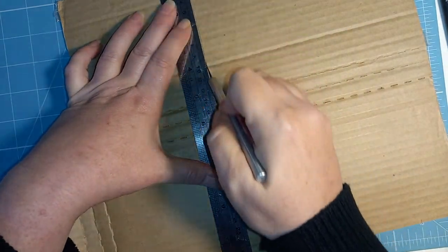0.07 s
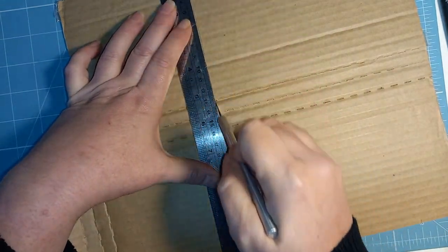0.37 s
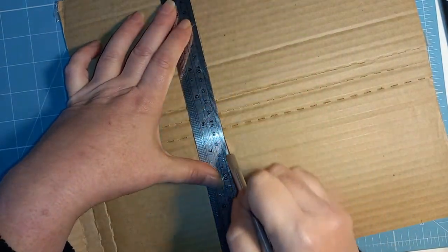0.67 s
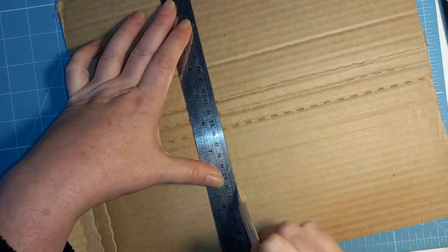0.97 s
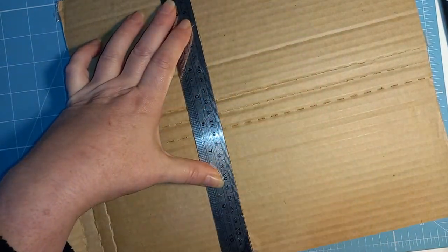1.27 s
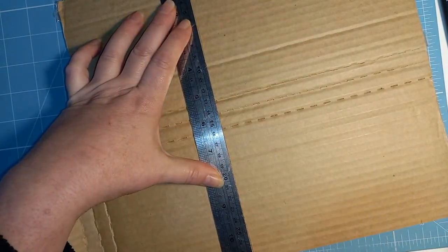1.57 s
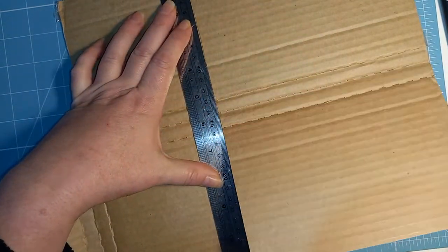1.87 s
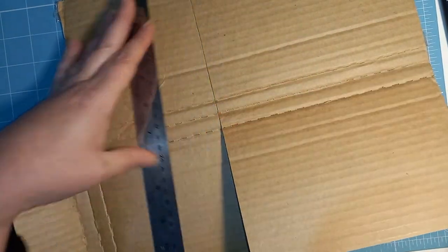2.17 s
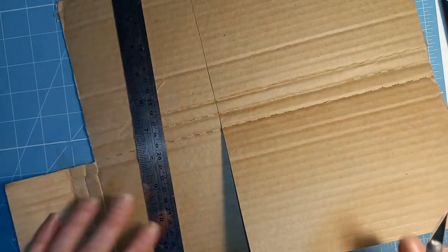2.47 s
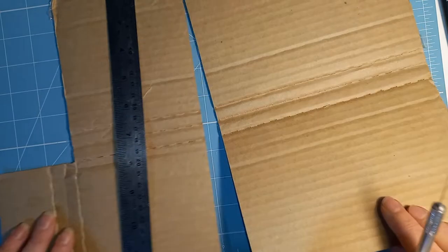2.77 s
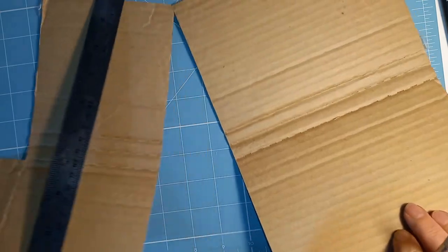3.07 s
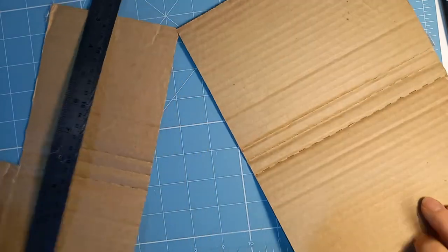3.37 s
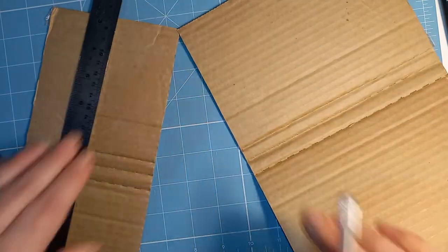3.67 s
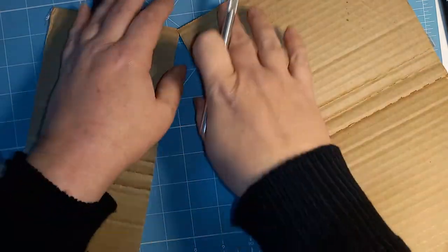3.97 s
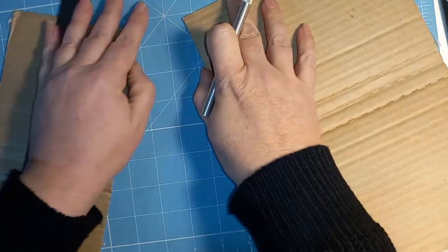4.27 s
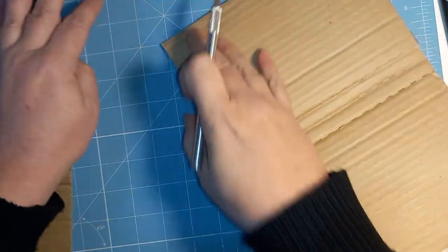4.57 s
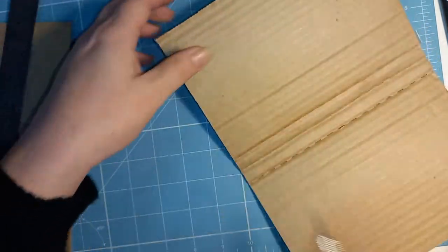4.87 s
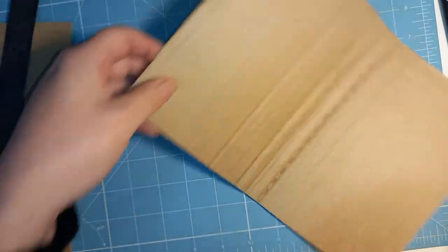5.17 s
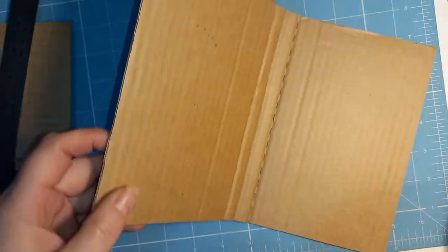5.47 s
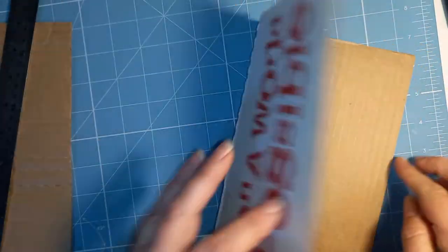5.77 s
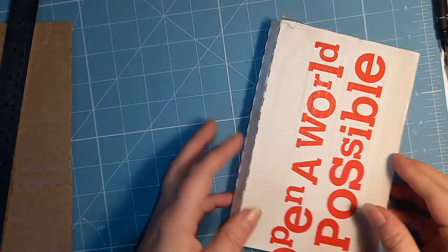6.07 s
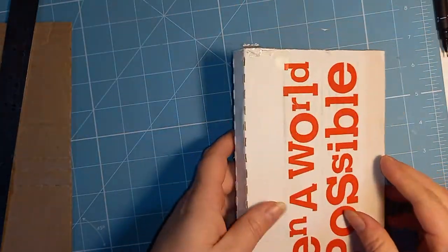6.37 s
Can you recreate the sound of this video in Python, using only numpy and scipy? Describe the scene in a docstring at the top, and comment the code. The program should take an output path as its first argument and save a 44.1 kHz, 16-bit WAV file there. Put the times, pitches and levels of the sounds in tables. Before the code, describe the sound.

A knife rasps through corrugated cardboard, then the card slides over a mat and folds shut with creaks and hollow claps.

```python
"""A craft knife rasps along a steel ruler through corrugated cardboard, tearing flute after flute.
The last fibres snap, the offcut hisses over the mat in three pulls, and the ruler drops with a clink.
Hands sweep the card across the mat and brush its liner. The flaps creak and fold shut with hollow
claps, then the fingers rub the piece again. Friction and blows ring the modes of the sheet;
all is heard close up, on a table in a small room."""
import sys
import numpy as np
from scipy import signal
from scipy.fft import rfft, irfft
from scipy.io import wavfile

SR = 44100
rng = np.random.default_rng(int(sys.argv[2]) if len(sys.argv) > 2 else 0)


def wav_out(sig):
    """Save sig, one row per channel (or a flat mono array), as 16-bit PCM at SR to the path in sys.argv[1]."""
    wavfile.write(sys.argv[1], SR, np.round(np.clip(np.atleast_2d(sig).T, -1, 1) * 32767).astype(np.int16))


N = 286694
TIME = np.arange(N) / SR
APART_HZ = 458   # left and right differ mainly above this

# force spectrum of a dull thud: freq_hz, level_db
THUD_DRIVE = [(30, -10), (70, -16), (130, -8.5), (280, 2), (420, -20), (800, -37.5), (2500, -78)]
# force spectrum of a hollow clap: freq_hz, level_db
CLAP_DRIVE = [(120, -34.5), (300, 2.5), (480, 16.5), (1200, 8.5), (2500, 3), (4000, -19), (9000, -30.5)]


def knife(give_s=.012, echo_s=.00088, echo_drift_s_per_s=.000421):
    """The blade scratches along and tears through each flute wall, jolting the sheet as it gives."""
    # force of the stroke: time_s, tear_db, rasp_db, shudder_db
    stroke = [(0.0, -42, -47.5, -42), (0.262, -43.5, -48.5, -50.5), (0.484, -36.5, -48, -41),
              (0.51, -47.5, -53, -49), (0.55, -36, -45, -45), (0.58, -40.5, -53, -42.5),
              (0.606, -38, -52, -45), (0.892, -40, -46, -38.5), (1.132, -41, -54.5, -45.5),
              (1.32, -37.5, -61, -39), (1.5, -42.5, -57, -46.5), (1.57, -86, -94, -67)]
    # blade travel: time_s, walls_passed
    travel = [(0, 0.1), (.042, 1), (.33, 6), (.478, 9), (.627, 11), (.778, 14), (.903, 17), (1.425, 28),
              (1.487, 29), (1.56, 29.6)]
    # short pushes through what still holds: peak_s, half_length_s, tear_db, rasp_db, shudder_db
    nicks = [(1.667, 0.0081, -41, -72, -40.5), (1.68, 0.058, -58, -72, -59),
             (1.813, 0.034, -50.5, -50, -52.5), (1.893, 0.011, -62, -60, -46)]
    # spectrum of a tearing wall: freq_hz, density_db
    tear_spectrum = [(600, -4.5), (1500, -6), (2300, -11.5), (3400, -6.5), (4700, -3), (6000, -7.5),
                     (8000, -2), (10000, -2), (12800, 8.5), (15500, -0.5)]
    # spectrum of the scratch between flutes: freq_hz, density_db
    scratch_spectrum = [(600, -21.5), (1500, -7.5), (2300, -7.5), (3200, -5), (4700, -4), (6000, -9),
                        (8000, -3.5), (10000, -0.5), (12800, 3), (15500, -3)]
    # force spectrum of the blade: freq_hz, level_db
    blade_drive = [(120, -21.5), (240, 10), (420, -2.5), (650, 2.5), (950, -10), (1500, 2.5), (2500, -0.5),
                   (5000, -56.5)]
    # force spectrum of the jolts: freq_hz, level_db
    shudder_drive = [(30, 6), (70, 3.5), (125, -4.5), (240, -13), (450, -39), (1500, -28.5)]
    bite_flutes, tear_flutes, lead_flutes = .2, .57, .33
    gate, tear_db, rasp_db, shudder_db = curves(stroke)
    _, passed = curves(travel)
    flute, depth = np.divmod(passed + lead_flutes, 1)
    toughness = from_db(rng.standard_normal(int(flute[-1]) + 1))[flute.astype(int)]
    bite = 1 - np.exp(-(depth / bite_flutes) ** 2)
    walls = toughness * bite * np.exp(-(depth / tear_flutes) ** 2)
    jolts = np.diff(np.floor(np.interp(TIME - give_s, TIME, passed)), prepend=0)
    tear_gain = gate * from_db(tear_db + 3) * walls
    scratch_gain = gate * from_db(tear_db - 6 - 3 * TIME)
    rasp_gain = gate * from_db(rasp_db - .5) * (walls + .5)
    shudder_gain = gate * from_db(shudder_db - 1)
    for peak_s, half_s, tear_db, rasp_db, shudder_db in nicks:
        tear_gain += from_db(tear_db) * swell(peak_s, half_s, half_s)
        rasp_gain += from_db(rasp_db) * swell(peak_s, half_s, half_s)
        shudder_gain += from_db(shudder_db) * swell(peak_s + give_s, half_s, half_s)
    grit = fibres(rate_per_s=3500, spread_db=3.5, grain_s=.0004)
    hiss = tear_gain * stereo(colour(grit, tear_spectrum), pan_db=-1)
    hiss += scratch_gain * stereo(colour(grit, scratch_spectrum))
    # the reflection off the ruler lags more as the blade travels
    delayed_s = TIME - echo_s - echo_drift_s_per_s * TIME
    hiss += from_db(-9) * np.array([np.interp(delayed_s, TIME, side) for side in hiss])
    rasp = stereo(board(grit, blade_drive))
    chatter = rng.standard_normal((2, N))
    shudder = stereo(board(.5 * rms_one(jolts) + chatter, shudder_drive))
    shudder /= np.sqrt(np.average(shudder[0] ** 2, weights=gate))
    return hiss + rasp_gain * rasp + shudder_gain * shudder


def sheet_hum():
    """The sheet hums under the blade, lower as the cut grows."""
    # sheet resonance: time_s, level_db, pitch_hz
    hum = [(0.0, -57.5, 900), (0.3, -53.5, 960), (0.6, -51.5, 950), (0.9, -51, 920), (1.1, -61.5, 740),
           (1.4, -57.5, 690), (1.53, -78, 680)]
    gate, level_db, pitch_hz = curves(hum)
    return gate * from_db(level_db - 2) * stick_slip(pitch_hz, width_hz=200, overtone_db=-20)


def knocks(hard_db=-18):
    """Each blow on the sheet gives a thud, a hollow clap, a slap of trapped air and a dry crack."""
    # spectrum of air squeezed from between the faces: freq_hz, density_db
    slap_spectrum = [(200, -18.5), (500, -7.5), (900, -3.5), (1500, -15.5), (2500, -20.5), (5000, -52.5)]
    # spectrum of crushed fibres: freq_hz, density_db
    crack_spectrum = [(1200, -6.5), (2400, 4.5), (3200, 2), (4600, -3), (6000, -10), (10000, -8.5),
                      (15500, -21)]
    out = np.zeros((2, N))
    for start_s, thud_db, clap_db, crack_db, pan_db in blows():
        impulse = 14 * min(from_db(clap_db - hard_db), 1)   # light touches land softly
        force = burst(t60_s=.012, tail_db=-18, tail_t60_s=.12)
        force[0, 0] += impulse
        puff = burst(t60_s=.005, tail_db=-30, tail_t60_s=.04)
        puff[0, 0] += impulse
        crush = burst(t60_s=.011, tail_db=-17, tail_t60_s=.1)
        sound = from_db(thud_db - 11) * stereo(board(force, THUD_DRIVE))
        sound += from_db(clap_db - 16) * stereo(board(force, CLAP_DRIVE), pan_db)
        sound += from_db(clap_db - 18) * stereo(colour(puff, slap_spectrum), pan_db)
        sound += from_db(crack_db - 16) * stereo(colour(crush, crack_spectrum), pan_db / 2)
        add(out, start_s, sound)
    return out


def blows(rebound_s=.012, rebound_loss_db=5):
    """Yield each blow and its ever weaker rebounds."""
    # blows on the sheet: start_s, thud_db, clap_db, crack_db, pan_db, rebounds (rounded; -1 mutes)
    hits = [(3.438, -35.5, -40, -27.5, 4, 0.5), (3.473, -42, -40.5, -32.5, 4, 1),
            (5.555, -61, -23, -39.5, -5.5, -0.5), (5.581, -26, -17, -32.5, -8, 0),
            (5.592, -54, -21.5, -28, -1, 0), (5.644, -34.5, -34.5, -36, 0, 0.5),
            (5.708, -20.5, -24.5, -34, -3, 3), (5.754, -18, -18.5, -32, 4, -0.5),
            (5.762, -23.5, -25, -27, 5, 0), (5.792, -25.5, -33, -28.5, 1, 0),
            (5.802, -29, -21, -31.5, -14, 0), (5.811, -27, -14.5, -26, 1.5, 0),
            (5.846, -26.5, -22, -34, -1.5, 1.5), (5.909, -36.5, -27.5, -40, -2, 1),
            (6.024, -55, -36, -60, -5, 0), (6.048, -44, -38, -48, 4, -1), (6.09, -62, -46, -54, -6, 0),
            (6.325, -35.5, -27, -43.5, -3.5, 4.5)]
    for start_s, thud_db, clap_db, crack_db, pan_db, rebounds in hits:
        for k in range(round(rebounds) + 1):
            loss_db = k * rebound_loss_db
            yield start_s, thud_db - loss_db, clap_db - loss_db, crack_db - loss_db, pan_db
            start_s += rebound_s * rng.uniform(.8, 1.2)


def folding(hollow_hz=666):
    """Uneven slips of the flaps sound the hollow between them."""
    # creaks around the fold: start_s, length_s, level_db
    creaks = [(5.21, 0.14, -53), (5.578, 0.071, -30), (5.714, 0.085, -26.5), (5.848, 0.2, -37.5),
              (6.151, 0.25, -49), (6.38, 0.056, -56.5)]
    # force spectrum of the slips: freq_hz, level_db
    fold_drive = [(60, -32.5), (250, 5), (420, -6), (640, 3.5), (900, -7), (2500, -7), (5000, -16.5),
                  (12000, 5)]
    grit = fibres(rate_per_s=640, spread_db=6, grain_s=.0012) * grip(rate_hz=22, depth_db=1.5)
    slips = board(grit, fold_drive)
    creak = stereo(slips + from_db(-5) * resonate(slips, hollow_hz, width_hz=64), pan_db=-3)
    return creak * sum(from_db(db + 1) * hand_push(start_s, length_s) for start_s, length_s, db in creaks)


def sliding():
    """Card dragged on the mat: catching fibres hiss and drive the sheet, and the edge sings."""
    # three pulls on the offcut, each a list of: time_s, hiss_db, rasp_db
    pulls = [
        [(1.95, -74, -75), (2.008, -36, -48), (2.068, -45.5, -55.5), (2.118, -38, -47), (2.178, -43, -55),
         (2.208, -43.5, -52), (2.244, -50, -55.5), (2.28, -73, -78)],
        [(2.44, -97, -72), (2.452, -72, -90), (2.494, -63, -77), (2.56, -62.5, -66), (2.614, -55.5, -76),
         (2.684, -49, -60.5), (2.744, -47, -59), (2.82, -63, -73)],
        [(2.82, -60.5, -70.5), (2.944, -51.5, -64.5), (3.1, -50, -61.5), (3.142, -52, -59), (3.154, -51, -54.5),
         (3.312, -66, -67.5), (3.384, -50.5, -64), (3.425, -50, -50)],
    ]
    # a hand sweeps the card along: start_s, length_s, hiss_db, rasp_db, rumble_db
    sweeps = [(3.982, 0.059, -59, -50, -45.5), (4.123, 0.092, -38, -45.5, -44.5),
              (4.32, 0.067, -43.5, -51, -76), (4.386, .1, -48, -52, -79), (4.485, 0.066, -45, -47.5, -65)]
    # resonance of the turning edge: time_s, level_db, pitch_hz
    edge = [(2.28, -70, 1750), (2.58, -68.5, 1795), (2.72, -52, 1916), (2.82, -62.5, 1796),
            (3.16, -59.5, 1326), (3.36, -64.5, 1305)]
    # spectrum of card on the mat: freq_hz, density_db
    hiss_spectrum = [(700, -23), (1800, -16.5), (3200, 8.5), (4600, 0), (6000, 2), (9000, 5.5), (12800, 7),
                     (15500, 2)]
    # force spectrum of the rasp: freq_hz, level_db
    rasp_drive = [(100, -13.5), (250, -0.5), (450, -5.5), (700, -4.5), (1200, 3.5), (1800, 7), (3000, 2.5),
                  (6000, 4)]
    # force spectrum of the rumble: freq_hz, level_db
    rumble_drive = [(30, 18.5), (70, -7), (130, -6), (220, 0.5), (400, -6.5), (1000, -48.5)]
    grit = fibres(rate_per_s=3000, spread_db=3.5, grain_s=.0014) * grip(rate_hz=29, depth_db=1.26)
    hiss = stereo(colour(grit, hiss_spectrum), pan_db=1.5)
    rasp = stereo(board(grit, rasp_drive), pan_db=1.5)
    rumble = stereo(board(grit, rumble_drive))
    gate, edge_db, pitch_hz = curves(edge)
    out = gate * from_db(edge_db - 4) * stick_slip(pitch_hz, width_hz=520, overtone_db=-13)
    body = from_db(.5) * rasp + from_db(-4) * rumble
    for pull in pulls:
        gate, hiss_db, rasp_db = curves(pull)
        out += gate * (from_db(hiss_db - 1) * hiss + from_db(rasp_db) * body)
    for start_s, length_s, hiss_db, rasp_db, rumble_db in sweeps:
        sweep = from_db(hiss_db) * hiss + from_db(rasp_db) * rasp + from_db(rumble_db) * rumble
        out += from_db(-1.5) * hand_push(start_s, length_s) * sweep
    return out


def ruler():
    """The steel strip lands and rings briefly, damped by the card under it."""
    # landings: start_s, level_db
    hits = [(3.441, -40.5), (3.473, -34)]
    # modes, from slow flexing to clink: freq_hz, level_db, t60_s
    modes = [(62.5, 2, 0.13), (98, 6, 0.048), (2300, -2, 0.15), (4160, -14.5, 0.071), (4520, -11, 0.15),
             (5200, -7.5, 0.08), (8430, -9.5, 0.065), (9560, -5.5, 0.045)]
    out, t = np.zeros((2, N)), TIME[:SR // 2]
    for start_s, hit_db in hits:
        for hz, mode_db, t60_s in modes:
            cycles = hz * t + rng.random((2, 1)) * min(hz / APART_HZ, 1)
            add(out, start_s, from_db(hit_db + mode_db - 60 * t / t60_s) * np.sin(2 * np.pi * cycles))
    return out


def snaps():
    """Snapping fibres and small dry contacts tick, too light to move the whole sheet."""
    # ticks: start_s, level_db
    ticks = [(0.417, -16), (1.617, -43), (1.731, -37), (1.7643, -25), (1.795, -19.5), (1.8203, -20),
             (1.832, -19), (1.8854, -24.5), (1.8895, -22), (2.1143, -22), (4.0585, -17.5), (4.8261, -44.5),
             (5.062, -42), (5.28, -31.5), (5.389, -44), (5.4739, -28.5), (5.5917, -8.5), (5.689, -27),
             (5.968, -30), (6.289, -32.5)]
    # spectrum of a tick: freq_hz, density_db
    tick_spectrum = [(300, -18.5), (700, -1), (2000, -3.5), (4500, -3.5), (9000, 0.5), (15500, -0.5)]
    out = np.zeros((2, N))
    for start_s, level_db in ticks:
        tick = colour(burst(t60_s=.015, tail_db=-29.5, tail_t60_s=.45), tick_spectrum)
        add(out, start_s, from_db(level_db - 31) * stereo(tick))
    return out


def crease(start_s=5.5925):
    """The stiff liner buckles once, with a short bright ring."""
    out = np.zeros((2, N))
    ring = resonate(burst(t60_s=.0057, tail_db=-31, tail_t60_s=.08), hz=4620, width_hz=500)
    add(out, start_s, from_db(-44.5) * stereo(ring, pan_db=-6))
    return out


def fingers(let_go_s=.011, sag_hz_per_s=900):
    """Skin hisses on the liner, and sticks and slips in a narrow band that sinks as it slows."""
    # brushes that gather speed until they let go: peak_s, rise_s, level_db
    brushes = [(5.064, .04, -56), (5.238, 0.098, -47), (5.3, 0.1, -57), (5.452, 0.24, -65.5),
               (6.27, 0.059, -59.5), (6.461, 0.025, -57.5)]
    # dull fingertip squeaks: peak_s, half_length_s, level_db, pitch_hz
    rubs = [(2.215, 0.02, -43, 1285), (5.058, 0.039, -52.5, 1328), (5.2, 0.083, -64, 1296),
            (6.115, 0.017, -43, 1257), (6.23, .025, -42, 1312)]
    # spectrum of skin on the liner: freq_hz, density_db
    skin_spectrum = [(1500, 3.3), (4000, 2.1), (6000, 3.7), (9000, 11.8), (12500, 10.8), (15500, 5)]
    grit = fibres(rate_per_s=2500, spread_db=3.8, grain_s=.0005)
    brush_gain = sum(from_db(db - 1) * swell(peak_s, rise_s, let_go_s) for peak_s, rise_s, db in brushes)
    out = brush_gain * stereo(colour(grit, skin_spectrum))
    for peak_s, half_s, level_db, pitch_hz in rubs:
        glide_hz = pitch_hz - sag_hz_per_s * np.clip(TIME - peak_s, -2 * half_s, 2 * half_s)
        squeak = stick_slip(glide_hz, width_hz=440, overtone_db=-15.5)
        out += from_db(level_db - 4) * swell(peak_s, half_s, half_s) * squeak
    return out


def bumps(settle_s=.03):
    """A soft hand loads the sheet gradually: thud and hollow clap without a crack."""
    # hand or card settles on the mat: peak_s, rise_s, thud_db, clap_db, pan_db
    touches = [(2.125, 0.022, -48.5, -62, 3), (2.93, .015, -57, -70, -3), (3.09, 0.012, -57, -70, -3),
               (3.165, 0.028, -53, -54.5, 2), (4.015, .012, -54.5, -51.5, -5), (4.067, 0.028, -50, -43, 2),
               (5.24, 0.014, -54, -46, 3), (5.259, 0.0025, -42.5, -39.5, -8),
               (5.498, 0.025, -37.5, -50, -9)]
    force = rng.standard_normal((2, N))
    thud, clap = stereo(board(force, THUD_DRIVE)), stereo(board(force, CLAP_DRIVE))
    out = np.zeros((2, N))
    for peak_s, rise_s, thud_db, clap_db, pan_db in touches:
        clap_gain = from_db(clap_db + np.array([[pan_db], [-pan_db]]) / 2)
        out += swell(peak_s, rise_s, settle_s) * (from_db(thud_db) * thud + clap_gain * clap)
    return from_db(-1) * out


def board(force, drive):
    """A force, coloured by its kind of contact, rings the sheet's modes."""
    # modes of the cardboard on the table: freq_hz, width_hz, level_db
    modes = [(63.5, 15.6, 1), (104, 35.4, 3), (134, 13.4, 4.5), (233.7, 32.2, 1.5), (332.6, 27, -3),
             (401, 56, -2), (509, 83, 0), (601, 57.6, 4), (707, 71, -0.5), (775.5, 42, 1), (937, 64, 1),
             (1050, 51, 1), (1137, 61, -2), (1230.5, 58, 1), (1368, 35, -3.5), (1416, 24, -6.5),
             (1589, 60, -1), (1918, 200, -11.5), (2250, 65, -1), (2460, 120, -7.5), (2975, 150, -5),
             (3540, 620, -14.5), (4770, 1200, -16)]
    push = kernel(drive)
    ring = sum((-1) ** k * from_db(db) * resonate(push, hz, width_hz)
               for k, (hz, width_hz, db) in enumerate(modes))
    return signal.fftconvolve(force, ring[None], axes=1)[:, :force.shape[1]]


def fibres(rate_per_s, spread_db, grain_s):
    """Friction: paper fibres catch and let go at random, each a tiny burst of its own size."""
    catches = rng.random(N) < rate_per_s / SR
    sizes = from_db(spread_db * np.clip(rng.standard_normal(N), -2.5, 2.5))
    energy = signal.lfilter([1], [1, -np.exp(-1 / (grain_s * SR))], catches * sizes ** 2 + 1e-18)
    return rms_one(np.sqrt(energy) * rng.standard_normal((2, N)))


def burst(t60_s, tail_db, tail_t60_s):
    """One contact: a brief crush of fibres, then a weaker rustle as the sheet settles."""
    t = TIME[:SR // 4]
    envelope = from_db(-60 * t / t60_s) + from_db(tail_db - 60 * t / tail_t60_s)
    return envelope * rng.standard_normal((2, len(t)))


def stick_slip(pitch_hz, width_hz, overtone_db):
    """Uneven slips sound a narrow resonance that follows the pitch curve."""
    slips = butterworth(rng.standard_normal((2, N)), 2, width_hz / 2)
    phase = 2 * np.pi * np.cumsum(pitch_hz) / SR
    return stereo(slips * (np.cos(phase) + from_db(overtone_db) * np.cos(2 * phase)))


def grip(rate_hz, depth_db):
    """The uneven grip of card on a surface, as a gain near 1."""
    drift = butterworth(rng.standard_normal(N), 2, rate_hz)
    return from_db(depth_db * np.clip(rms_one(drift), -2, 2))


def hand_push(start_s, length_s, attack_s=.051, release_t60_s=.15):
    """Attack, hold and release of one steady push."""
    attack = np.sin(np.pi / 2 * np.clip((TIME - start_s) / attack_s, 0, 1)) ** 2
    return attack * from_db(-60 * np.clip((TIME - start_s - length_s) / release_t60_s, 0, 2))


def tabletop(x):
    """Direct sound plus close reflections, which ripple the spectrum above the bass."""
    # reflections off the table and things on it, left list then right: delay_s, level_db
    near_echoes = [
        [(.0011, -32), (.0034, -11)],
        [(.0015, -10), (.0029, -7)],
    ]
    out, bright = x.copy(), butterworth(x, 1, 700, "high")
    for side, echoes in enumerate(near_echoes):
        for delay_s, level_db in echoes:
            add(out[side:side + 1], delay_s, from_db(level_db) * bright[side:side + 1])
    return out


def room(x, t60_s=.14, gap_s=.0022, dull_hz=5140):
    """Dense, dull reflections that start a few milliseconds late."""
    t = TIME[:SR // 4]
    envelope = from_db(-60 * t / t60_s) * np.clip(t / gap_s - 1, 0, 1)
    echoes = stereo(envelope * rng.standard_normal((2, len(t))))
    echoes /= np.sqrt(np.sum(echoes ** 2, axis=1, keepdims=True))
    return from_db(-3.5) * signal.fftconvolve(x, butterworth(echoes, 1, dull_hz), axes=1)[:, :N]


def room_air(level_db=-72):
    """The still air of the room: faint, low noise."""
    # spectrum of the air: freq_hz, density_db
    air_spectrum = [(25, -25.5), (45, -7.5), (90, -1.5), (190, -15), (260, -11.5), (420, -20.5),
                    (1000, -27), (2000, -34), (5000, -37.5), (16000, -36)]
    return from_db(level_db) * stereo(colour(rng.standard_normal((2, N)), air_spectrum))


def from_db(db):
    """Decibels to gain."""
    return 10 ** (np.asarray(db) / 20)


def rms_one(x):
    """Scale to rms 1."""
    return x / np.sqrt(np.mean(x ** 2) + 1e-20)


def curves(rows):
    """A gate open during the gesture, then each column as a curve in time."""
    time_s, *columns = np.transpose(rows)
    gate = np.clip(np.minimum(TIME - time_s[0], time_s[-1] - TIME) / .01 + 1, 0, 1)
    return [gate] + [np.interp(TIME, time_s, column) for column in columns]


def swell(peak_s, rise_s, fall_s):
    """Gaussian rise to 1 and fall."""
    width_s = np.where(TIME < peak_s, rise_s, fall_s)
    return np.exp(-np.minimum(((TIME - peak_s) / width_s) ** 2, 20))


def add(out, start_s, sound):
    """Mix a sound in at start_s."""
    start = max(round(start_s * SR), 0)
    out[:, start:start + sound.shape[1]] += sound[:, :N - start]


def butterworth(x, order, hz, kind="low"):
    """Low- or high-pass filter."""
    return signal.sosfilt(signal.butter(order, hz, kind, fs=SR, output="sos"), x)


def resonate(x, hz, width_hz):
    """One resonance with peak gain 1."""
    r = np.exp(-np.pi * width_hz / SR)
    feedback = [1, -2 * r * np.cos(2 * np.pi * hz / SR), r * r]
    return signal.lfilter(np.array([1, 0, -1]) * (1 - r * r) / 2, feedback, x + 1e-18)


def kernel(spectrum, size=2 ** 13):
    """Minimum-phase impulse response with the given spectrum."""
    hz, db = np.transpose(spectrum)
    bins_hz = np.arange(size // 2 + 1) * SR / size
    log_gain = np.log(from_db(np.interp(np.log(bins_hz + 1), np.log(hz), db)))
    cepstrum = irfft(log_gain)[:size // 2] * np.r_[1, np.full(size // 2 - 1, 2)]
    return irfft(np.exp(rfft(cepstrum, size)))


def colour(x, spectrum):
    """Filter a pair of signals to the given spectrum."""
    return signal.fftconvolve(x, kernel(spectrum)[None], axes=1)[:, :x.shape[1]]


def stereo(x, pan_db=0):
    """Two unrelated signals become left and right, alike in the bass; mid rms 1, positive pan left."""
    mid = x[0]
    side = .8 * butterworth(x[1], 2, APART_HZ, "high") + .17 * x[1]
    left, right = (mid + side) * from_db(pan_db / 2), (mid - side) * from_db(-pan_db / 2)
    return np.array([left, right]) / np.sqrt(np.mean(mid ** 2))


def scene():
    """The work on the table, its reflections and the room air."""
    work = knife() + sheet_hum() + sliding() + fingers() + folding()
    work += knocks() + bumps() + snaps() + crease() + ruler()
    work += from_db(-3) * resonate(work, hz=120, width_hz=17)   # the table top booms
    return tabletop(work) + room(work) + room_air()


def record(dry):
    """Cut the deepest bass, round the highest peaks and cut the top."""
    low_hz, high_hz = 40, 16000
    rounded = np.tanh(butterworth(dry, 4, low_hz, "high"))
    return signal.sosfilt(signal.ellip(12, .3, 100, high_hz, fs=SR, output="sos"), rounded)


dry = scene()
out = record(dry)
wav_out(out)
```